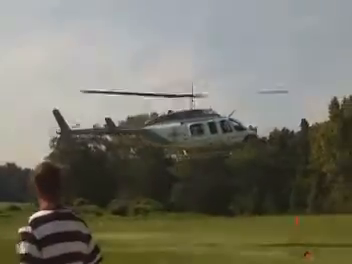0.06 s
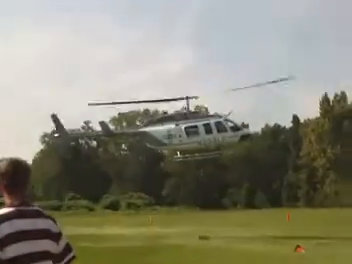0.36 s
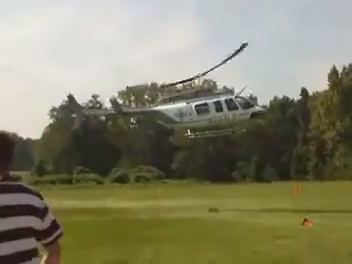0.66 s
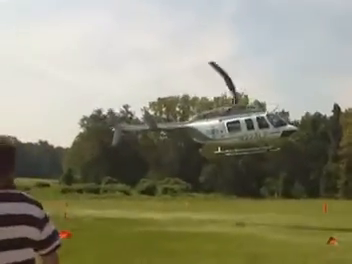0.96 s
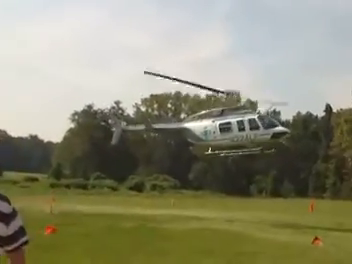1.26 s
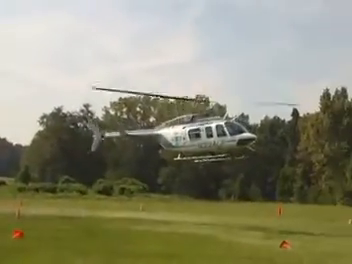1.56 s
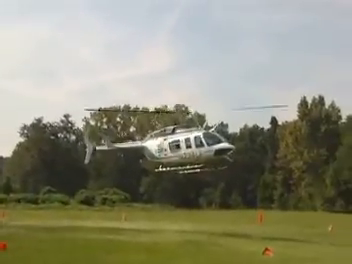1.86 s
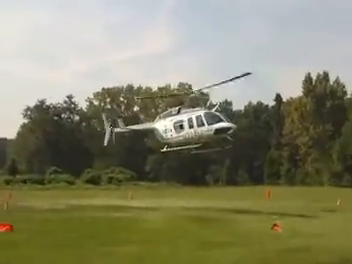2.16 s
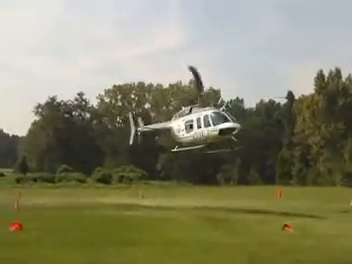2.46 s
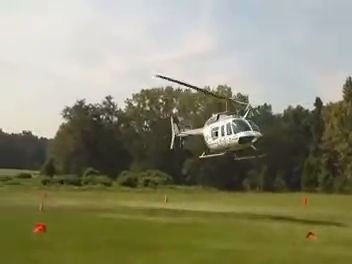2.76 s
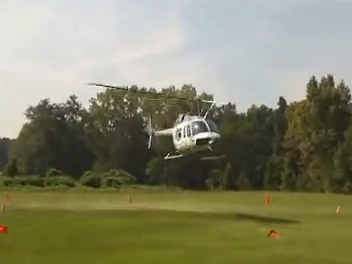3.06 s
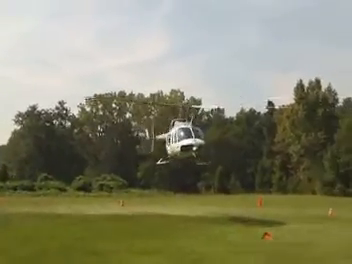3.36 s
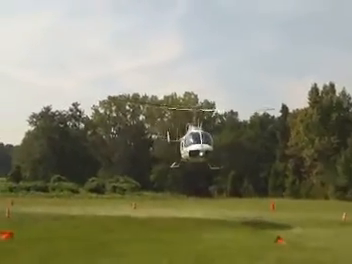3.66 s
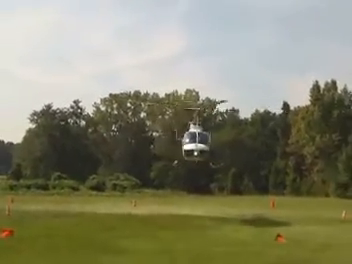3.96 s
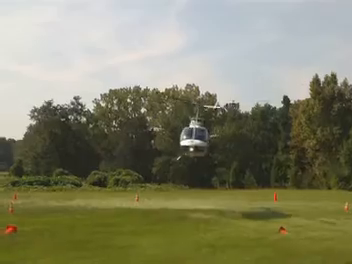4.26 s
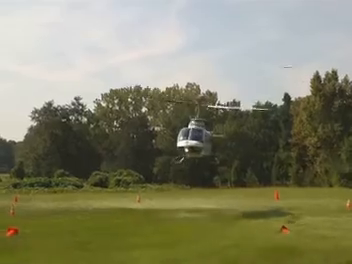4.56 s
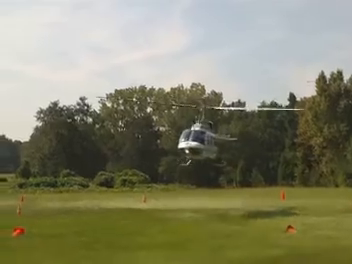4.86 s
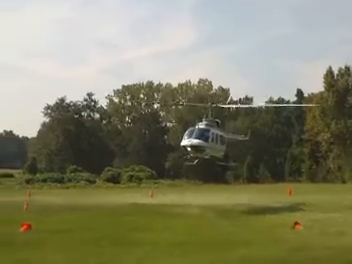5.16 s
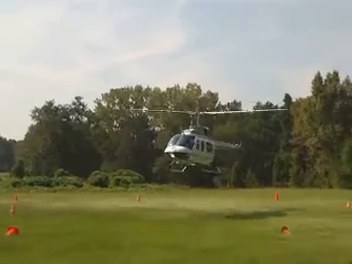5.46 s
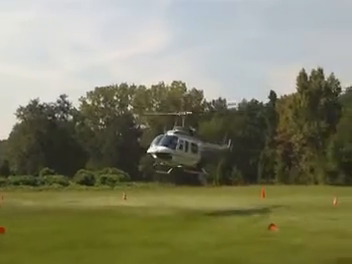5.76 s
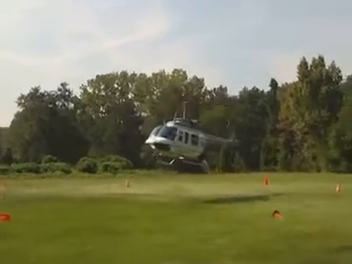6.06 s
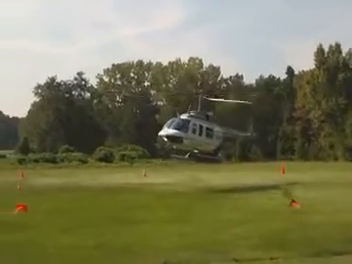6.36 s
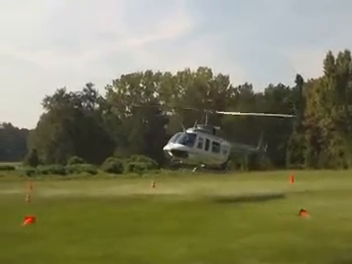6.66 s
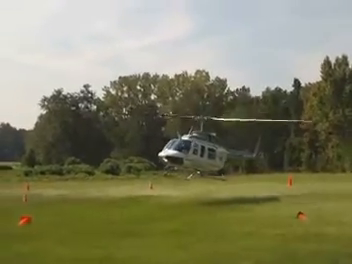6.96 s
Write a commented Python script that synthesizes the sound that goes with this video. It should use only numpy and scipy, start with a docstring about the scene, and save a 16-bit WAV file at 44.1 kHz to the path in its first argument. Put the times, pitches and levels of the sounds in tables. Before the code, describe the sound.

Fast chopping rotor beats, a buzzing tail rotor and a hissing engine from a hovering helicopter, with gusts rumbling on the microphone.

```python
"""A grass field, with a light two-bladed helicopter hovering low, turning on the spot and drifting a few
metres away and back. The main blades swish, slap and thump as they cut their own tip vortices; the tail
rotor rasps in their wake and hums. Exhaust and downwash roar, the turbine hisses, and the ground throws
back a duller reflection. Gusts buffet the camera's microphone and overload it on the loudest peaks."""
import sys
import numpy as np
from scipy.fft import rfft, irfft, next_fast_len
from scipy.io import wavfile
from scipy.ndimage import uniform_filter1d, map_coordinates

SR = 44100
rng = np.random.default_rng(int(sys.argv[2]) if len(sys.argv) > 2 else 0)


def waveform_to_disk(signal):
    """Save audio, clipped to [-1, 1], as 16-bit WAV at the path in sys.argv[1]."""
    frames = np.transpose(np.atleast_2d(signal))
    scaled = np.clip(frames, -1, 1) * 32767
    samples = np.round(scaled).astype(np.int16)
    wavfile.write(sys.argv[1], SR, samples)


N = 309582

BLADE_HZ, TAIL_HZ = 12.7307, 83.0  # blade passes a second: main rotor, tail rotor
TAIL_FIRST_S = .0057  # a tail blade's first pass
# the turn on the spot: t/s, angle between the nose and the microphone/degrees
HEADING = [(0, 89), (1.5, 51), (2.5, 34), (4, 7), (7, -20.5)]
# strength of exhaust and downwash, which the tail drone follows too: t/s, level/dB
ROAR = [(0.0, -18.5), (0.86, -18.5), (1.02, -19.5), (1.64, -23), (2.05, -25), (2.58, -24), (3.03, -28),
        (3.46, -30.5), (3.6, -31), (3.99, -25), (4.4, -30), (4.98, -24), (5.2, -28), (6.12, -25),
        (6.69, -27.5), (7.02, -32)]


def main_rotor(swish_s=.0031, tip_s=.0028, wash_s=.011, vortex_gap_s=.002843):
    """Each blade gives a dull swish, then a brighter tip slap, in a soft wash; cut vortices thump."""
    # load on the rotor: t/s, level/dB
    blade_load = [(0, -17), (.9, -17.5), (1.5, -21.5), (2.15, -25), (2.4, -21), (2.9, -19.5), (3.12, -23.5),
                  (3.3, -19), (3.6, -21), (4.2, -19), (4.8, -17), (5.4, -19), (6.1, -18.5), (6.4, -19),
                  (7, -17.5)]
    # each pass splits in two as the helicopter turns: t/s, swish ahead/s, tip slap behind/s
    strike_split = [(0, 0.0011, 0.0009), (1.5, 0.0023, 0.00064), (2.5, 0.00065, 0.0045),
                    (3.3, 0.0039, 0.0063), (3.9, 0.003, 0.003), (4.7, 0.0039, 0.0085),
                    (5.4, 0.0041, 0.0081), (6.2, 0.0048, 0.0092), (6.6, 0.0014, 0.011),
                    (7, 0.00055, 0.0058)]
    # a ragged wake smears each pass: t/s, length/usual length
    wake_smear = [(0, 1.3), (3.3, 1.1), (5.2, 1.15), (6.1, 1.8), (7, 1.45)]
    # spectra of swish, tip slap and thump: f/Hz, level/dB
    swish_spectrum = [(120, -29.5), (280, 2), (450, 4), (750, 1), (1000, 1), (1350, -3.5), (1600, -13.5),
                      (3000, -20.5), (7000, -37.5)]
    tip_spectrum = [(150, -21), (350, 9), (700, -2), (1300, -4), (2000, -8), (3300, -10.5), (7000, -23.5)]
    thump_spectrum = [(150, -16.5), (230, -5), (310, -3), (420, 1), (530, -9), (700, -2.5), (900, -12),
                      (1200, -27), (2000, -22.5), (6000, -18)]
    t, number = passes(BLADE_HZ, first=.037)
    ahead, behind = curves(strike_split)
    smear, = curves(wake_smear)
    side = side_on()
    thump_db, tip_db = -13.5 + 2.5 * side, 3.3 - 2.8 * side  # thumping side-on, bright nose-on
    swish = amp(4) * bell(t + ahead, swish_s * smear) * steadied(noise(swish_spectrum))
    swish *= scatter(number, spread_db=.4)
    tip = amp(tip_db) * bell(t - behind, tip_s * smear) * steadied(noise(tip_spectrum))
    wash = amp(-6) * bell(t - (behind - ahead) / 2, wash_s) * noise(swish_spectrum)
    # three vortices are cut in quick succession
    hits = sum(.64 ** abs(k) * cracks(t - k * vortex_gap_s, number, spread_db=4, jitter_s=.00034)
               for k in (-1, 0, 1))
    thump = amp(thump_db) * coloured(hits, thump_spectrum)
    beat = amp(curves(blade_load)[0]) * (over_grass((swish + tip) / np.sqrt(smear) + wash) + thump)
    chops, outline = hard_slaps()
    return beat * (1 - .63 * outline) + chops  # a hard slap displaces most of the usual beat


def hard_slaps(width_s=.0016, reference_hz=800):
    """A blade strikes a vortex squarely: a short pitched chop and a crack. Returns sound and outline."""
    # square strikes: t/s, level/dB, f/Hz
    strikes = [(.037, -1.5, 398), (.116, 2.5, 325), (.195, -3, 391), (.273, -3.5, 505), (.589, -3.5, 590),
               (.658, -10.5, 603), (.668, -16.5, 1000), (.746, -5, 680), (.986, -10.5, 897),
               (1.217, -8, 417), (1.374, -10, 550), (1.609, -5.5, 710), (1.925, -11, 803),
               (2.485, -8.5, 440), (2.957, -10, 1225), (3.277, -8.5, 1313), (3.344, -10, 663),
               (3.356, -9.5, 1340), (3.434, -11.5, 1860), (3.513, -15.5, 1920), (3.739, -8, 705),
               (3.751, -13.5, 1330), (3.819, -7.5, 710), (4.214, -6.5, 682), (4.222, -12, 1280),
               (4.529, -8.5, 700), (4.606, -8, 1062), (4.693, -9, 1337), (4.84, -7.5, 1090),
               (4.918, -8.5, 612), (4.929, -8.5, 1347), (4.996, -9.5, 555), (5.151, -8, 704),
               (5.463, -9.5, 970), (5.697, -8, 703), (6.873, -6, 660), (6.952, -7.5, 694)]
    # their crack: f/Hz, level/dB
    crack_spectrum = [(400, -14), (800, -0.5), (1350, -1.5), (2100, -2.5), (3200, -6.5), (7000, -22.5)]
    t = np.arange(N) / SR
    chops, outline = np.zeros(N), np.zeros(N)
    crack = amp(-11) * steadied(noise(crack_spectrum))
    overtone = amp(-6) * side_on()
    waver = .3 * wobble(500)
    for s, db, hz in strikes:
        near = np.abs(t - s) < .02
        shape = bell(t[near] - s, width_s * (reference_hz / hz) ** .4)  # low chops last longer
        phase = 2 * np.pi * hz * (t[near] - s) + rng.uniform(0, 2 * np.pi) + waver[near]
        tone = np.sin(phase) + overtone[near] * np.sin(2 * phase)
        chops[near] += amp(db) * shape * (tone + (hz / reference_hz) ** .56 * crack[near])
        outline[near] = np.maximum(outline[near], shape)
    return chops, outline


def tail_rotor():
    """Each small blade cuts the main rotor's wake: a tick in a burst of turbulence, over an even drone."""
    # a blade's cut, from soft rush to dry tick: t/s, burst width/s, tick level/dB
    cut_edge = [(0, 0.0019, -10), (.85, 0.0011, -4), (1.3, 0.0022, -7.5), (2.45, 0.0018, -2),
                (2.72, 0.0026, -5.5), (3.4, 0.00071, -4.5), (5, 0.00063, -4.5), (6, 0.0022, -1),
                (7, 0.00073, -5)]
    # single blades hit a vortex and snap: t/s, level/dB
    vortex_hits = [(2.378, -48), (2.715, -51.5), (4.852, -47.5), (4.97, -57), (5.018, -47.5),
                   (5.054, -48.5), (5.211, -53.5), (5.843, -48.5)]
    # spectra of rasp and drone: f/Hz, level/dB
    rasp_spectrum = [(200, -10), (450, -0.5), (700, 5), (1200, 6), (2000, 4), (3600, 3.5), (5500, -6),
                     (7200, -21)]
    drone_spectrum = [(250, -5.5), (420, 4), (650, 1), (800, 3.5), (1000, 0), (1300, -2), (2000, -19.5),
                      (3500, -34.5), (7000, -52)]
    t, number = passes(TAIL_HZ, TAIL_FIRST_S)
    width, tick_db = curves(cut_edge)
    level = rasp_level()
    gate = bell(t, width) / np.sqrt(width)
    turbulence = steadied(rng.standard_normal(N), window_s=.0032)
    bursts = coloured(gate * turbulence * scatter(number, spread_db=4), rasp_spectrum)
    pulses = cracks(t + .00005 * wobble(14), number, spread_db=2.5, jitter_s=.00006)
    ticks = coloured(pulses, rasp_spectrum)
    wake = throb(BLADE_HZ, first=.023, depth_db=1)  # sweeps through once for each main blade
    rasp = level * wake * (amp(1.5) * bursts + amp(tick_db) * ticks)
    blows = sum(amp(db) * swell(s, 2 / SR, 2 / SR) for s, db in vortex_hits)
    snaps = np.linalg.norm([amp(db) for s, db in vortex_hits]) * coloured(blows, rasp_spectrum)
    # scattered by the airframe, the pulses keep their pitch but lose their edge
    phase = 2 * np.pi * TAIL_HZ * source_time()
    harmonics = sum(np.sin(k * phase + .085 * k * wobble(5) + rng.uniform(0, 2 * np.pi))
                    for k in range(4, 29))
    buzz = amp(-4) * level * coloured(harmonics, rasp_spectrum)
    drone = amp(curves(ROAR)[0] - 8 + 1.5 * side_on()) * coloured(harmonics, drone_spectrum)
    return rasp + buzz + snaps + drone


def rasp_level(steady_db=-40):
    """Gain of the tail rotor's rasp, which swells when it runs into the main rotor's wake."""
    # runs into the wake: t/s, level/dB, rise/s, fall/s
    encounters = [(.83, -21.5, 0.08, 0.079), (.905, -24.5, .02, .035), (2.42, -26, 0.088, 0.078),
                  (2.69, -21.5, 0.07, 0.03), (3.43, -27.5, 0.05, 0.072), (4.26, -32, 0.043, 0.023),
                  (5.001, -29, 0.066, 0.042), (5.85, -31.5, 0.32, 0.12), (6.17, -28, 0.055, 0.088)]
    power = sum((amp(db) * swell(s, rise, fall)) ** 2 for s, db, rise, fall in encounters)
    return np.sqrt(amp(steady_db) ** 2 + power)


def tail_hum(waver_db=.5):
    """The tail rotor's steady thrust: low harmonics that change with heading and waver in moving air."""
    # harmonics: multiple of the blade rate, nose-on level/dB, slope/dB per degree of heading
    harmonics = [(1, -34, 0.1424), (2, -28, -0.0644), (3, -37, -0.0515)]
    phase = 2 * np.pi * TAIL_HZ * source_time()
    heading, = curves(HEADING)
    hum = np.zeros(N)
    for k, db, slope in harmonics:
        level = amp(db + slope * heading + waver_db * wobble(3.7))
        hum += level * np.sin(k * phase + .21 * wobble(8.7) + rng.uniform(0, 2 * np.pi))
    return np.sqrt(2) * hum


def exhaust(flutter_db=3):
    """Exhaust and downwash make a fluttering roar."""
    # the roar: f/Hz, level/dB
    spectrum = [(60, -8.5), (200, 1.5), (330, 0.5), (500, -8.5), (720, -1.5), (1000, -6), (1300, -7.5),
                (2000, -9.5), (4000, -28), (7200, -50.5)]
    return amp(curves(ROAR)[0] - 1.36 + flutter_db * wobble(35)) * noise(spectrum)


def turbine(shimmer_db=1, treble_hz=4500):
    """The turbine hisses, a little brighter nose-on."""
    # colour of the hiss: f/Hz, level/dB
    spectrum = [(500, -22.5), (1200, -24.5), (2000, 2.5), (3200, 4.5), (4400, 2), (5100, 0), (6100, 1),
                (6800, -6), (7200, -15.5)]
    # its strength: t/s, level/dB
    hiss_level = [(0.0, -26.5), (0.6, -27), (0.7, -27.5), (1.13, -27.5), (1.82, -27), (2.15, -28),
                  (2.54, -26), (2.68, -27.5), (2.99, -28), (3.42, -29.5), (3.6, -30), (3.77, -30.5),
                  (4.05, -29), (4.36, -32.5), (4.55, -31), (4.83, -27.5), (5.06, -28), (5.2, -31.5),
                  (5.38, -32), (5.79, -30), (5.92, -29.5), (7.02, -30.5)]
    hiss = noise(spectrum)
    treble = filtered(hiss, lambda hz: 1 - bell(hz / treble_hz, .93))
    hiss += (amp(2.25 - 1.5 * side_on()) - 1) * treble
    # the tail blades chop the hiss, and turbulent air on the way makes it shimmer
    hiss *= throb(TAIL_HZ, TAIL_FIRST_S, depth_db=1.5)
    return hiss * amp(curves(hiss_level)[0] - .03 + shimmer_db * wobble(22))


def thin_tones():
    """Tail-rotor overtones and a gearbox note surface briefly over the hiss."""
    # brief tones: t/s, f/Hz, level/dB, width/s
    tones = [(1.08, 758, -26, .2), (1.93, 1497, -28.5, 0.16), (2.4, 1700, -34, 0.2), (2.4, 805, -33, .2),
             (2.12, 798, -14.5, 0.0084), (4.22, 1710, -35, 0.057), (5.95, 501.4, -37, 0.51),
             (6.4, 773.4, -30, 0.95)]
    t = np.arange(N) / SR
    return sum(amp(db - 2) * swell(s, width, width) * np.sin(2 * np.pi * hz * t + .44 * wobble(15))
               for s, hz, db, width in tones)


def over_grass(x, share=.33, dull_hz=2600):
    """The ground reflection reaches the microphone later and duller: a slowly shifting comb of bands."""
    # the lag follows height and distance: t/s, lag/s
    lag = [(0, 0.00168), (1, 0.00158), (2.4, 0.00159), (3.2, .00151), (4.2, 0.00164), (5.3, 0.001596),
           (7, 0.00158)]
    t = np.arange(N) / SR
    dulled = filtered(x, lambda hz: np.exp(-(hz / dull_hz) ** 2))
    return x + share * np.interp(t - curves(lag)[0], t, dulled)


def wind(lull_gain):
    """Rumble and flutter on the microphone; a hard gust is one push and pull, trailed by small eddies."""
    # wind at the microphone: t/s, level/dB
    breeze = [(0, -18), (.45, -15.5), (.9, -15), (1.1, -11.5), (1.5, -13), (1.75, -14.5), (2.1, -14.5),
              (2.5, -20.5), (2.92, -21), (3.15, -16), (3.75, -16), (4.2, -12), (4.7, -16), (5.35, -13),
              (6.05, -15.5), (6.3, -17), (6.65, -14), (7.02, -14)]
    # the hardest gusts: t/s, level/dB, swing/s
    gusts = [(0.063, -2.5, .011), (0.124, -3.5, 0.0048), (0.325, -2, 0.0085), (0.401, -2.5, 0.0099),
             (0.579, 3, 0.0058), (.808, -5.5, .018), (1.112, 4, 0.0074), (1.22, -1, 0.0046),
             (1.325, 2.5, 0.0035), (1.396, 0, 0.008), (1.503, 0.5, 0.018), (3.066, -5.5, .016),
             (3.188, -4, .01), (3.534, -4, 0.0093), (3.626, -8.5, 0.011), (3.68, -5.5, 0.024),
             (3.802, 0, 0.0019), (4.03, 2, 0.013), (4.136, -4, 0.0051), (4.211, -3.5, 0.0098),
             (4.363, 3, 0.0095), (4.53, -2, 0.0086), (4.759, 2.5, 0.011), (4.935, -5.5, 0.0066),
             (5.067, -3.5, 0.01), (5.267, 1.5, 0.0082), (5.506, 5, 0.0088), (5.954, 2, 0.012),
             (6.064, 2.5, 0.016), (6.609, -3, 0.011), (6.929, -3.5, .014)]
    # flurries of small eddies: t/s, level/dB, width/s
    flurries = [(.12, -12.5, 0.082), (0.599, -8, 0.019), (1.301, -17, 0.065), (2.04, -18.5, 0.06),
                (3.249, -18.5, 0.04), (4.37, -17, .02), (4.85, -27.5, 0.2), (5.46, -16.5, 0.12)]
    # spectra of rumble and eddies: f/Hz, level/dB
    rumble_spectrum = [(4, -29.5), (12, 4.5), (25, 2.5), (50, 0.5), (70, -8), (110, -19.5), (300, -83.5)]
    eddy_spectrum = [(35, -8.5), (60, -0.5), (85, 1.5), (120, -5), (170, -10), (250, -16), (500, -25.5),
                     (2000, -72.5)]
    strength = amp(curves(breeze)[0])
    flurry = sum(amp(db) * swell(s, width, width) for s, db, width in flurries)
    lumps, sputter = amp(2.2 * wobble(16)), amp(2 * wobble(7.9))
    rumble = strength * unit(sputter * steadied(noise(rumble_spectrum), window_s=.2))
    eddies = unit(lumps * steadied(noise(eddy_spectrum), window_s=.075))
    flutter = np.hypot(amp(-5.5) * strength, flurry) * eddies
    air = lull_gain * (rumble + flutter)
    t = np.arange(N) / SR
    trail = amp(-11) * steadied(noise(eddy_spectrum), window_s=.042)
    for s, db, swing in gusts:
        u = (t - s) / swing - .5
        push_pull = -2 * u * bell(u, .57)
        air *= 1 - bell(u, .93)  # the gust sweeps the smaller turbulence aside
        air += amp(db) * (push_pull + trail * bell(t - s - .025, .011))
    return air


def source_time():
    """When the sound now at the microphone left the helicopter; drift gives a slight Doppler shift."""
    # away and back: t/s, extra distance/m
    drift = [(0, 0), (1, 1.2), (2, 1.8), (3.3, 4.9), (4.4, 6.1), (5, 4.9), (6.3, 1.3), (7.02, .5)]
    return np.arange(N) / SR - curves(drift)[0] / 343


def side_on():
    """How much of its side the helicopter shows: 0 nose-on, 1 broadside."""
    return np.sin(np.radians(curves(HEADING)[0])) ** 2


def passes(rate, first):
    """For each sample: seconds from the nearest blade pass, and that pass's number."""
    turns = (source_time() - first) * rate
    number = np.round(turns)
    return (turns - number) / rate, number.astype(int) + 1


def throb(rate, first, depth_db):
    """A gain that peaks at every blade pass."""
    return amp(depth_db * np.cos(2 * np.pi * rate * passes(rate, first)[0]))


def scatter(number, spread_db):
    """A new random gain for every blade pass."""
    return amp(spread_db * rng.standard_normal(1024)[number])


def cracks(t, number, spread_db, jitter_s):
    """One sharp pressure pulse a pass, each a little different in size and moment."""
    late = jitter_s * rng.standard_normal(1024)[number]
    return bell(t - late, 2 / SR) * scatter(number, spread_db)


def amp(db):
    """Decibels to gain."""
    return 10 ** (np.asarray(db) / 20)


def unit(x):
    """x at rms 1."""
    return x / np.sqrt(np.mean(x ** 2) + 1e-20)


def curves(rows):
    """One value per sample for each column after the time."""
    s, *cols = np.transpose(rows)
    return [np.interp(np.arange(N) / SR, s, c) for c in cols]


def wobble(rate):
    """A smooth random curve, rate knots a second."""
    return map_coordinates(rng.standard_normal(int(N * rate / SR) + 4), [np.arange(N) * rate / SR])


def bell(t, width):
    """A smooth bump around t = 0."""
    return np.exp(-.5 * (t / width) ** 2)


def swell(s, rise, fall):
    """A smooth rise to 1 at time s and a smooth fall."""
    first, last = np.clip([(s - 6 * rise) * SR, (s + 6 * fall) * SR], 0, N).astype(int)
    t = np.arange(first, last) / SR - s
    return np.pad(bell(t, np.where(t < 0, rise, fall)), (first, N - last))


def filtered(x, response):
    """x through a gain that depends on frequency."""
    m = next_fast_len(N + SR // 2)
    return irfft(rfft(x, m) * response(np.fft.rfftfreq(m, 1 / SR)), m)[:N]


def coloured(x, spectrum):
    """x shaped by (Hz, dB) points on a log axis, at rms 1."""
    f, db = np.transpose(spectrum)
    return unit(filtered(x, lambda hz: amp(np.interp(np.log(hz + 1), np.log(f), db))))


def noise(spectrum):
    """Coloured noise of rms 1."""
    return coloured(rng.standard_normal(N), spectrum)


def steadied(x, window_s=.012):
    """Noise with its level swings evened out, so that short bursts of it are alike in strength."""
    return x / np.sqrt(np.abs(uniform_filter1d(x ** 2, int(window_s * SR))) + 1e-9)


def scene():
    """The helicopter over its ground reflection, and wind, at one microphone."""
    # the level dips briefly, the bass most: t/s, width/s, helicopter/dB, wind and hum/dB
    dip = (3.7, .04, -2, -12)
    s, width, helicopter_db, bass_db = dip
    lull = swell(s, width, width)
    bass_gain = amp(bass_db * lull)
    helicopter = main_rotor() + over_grass(tail_rotor() + exhaust() + turbine() + thin_tones())
    return (amp(helicopter_db * lull) * helicopter + bass_gain * tail_hum() + wind(bass_gain))[None]


def record(dry, ceiling=1.07, hardness=12, top_hz=7250):
    """The camera overloads on the loudest peaks, flattening them, and cuts off the high treble."""
    flattened = dry[0] / (1 + np.abs(dry[0] / ceiling) ** hardness) ** (1 / hardness)
    return filtered(flattened, lambda hz: hz < top_hz)[None]


dry = scene()
out = record(dry)
waveform_to_disk(out)
```